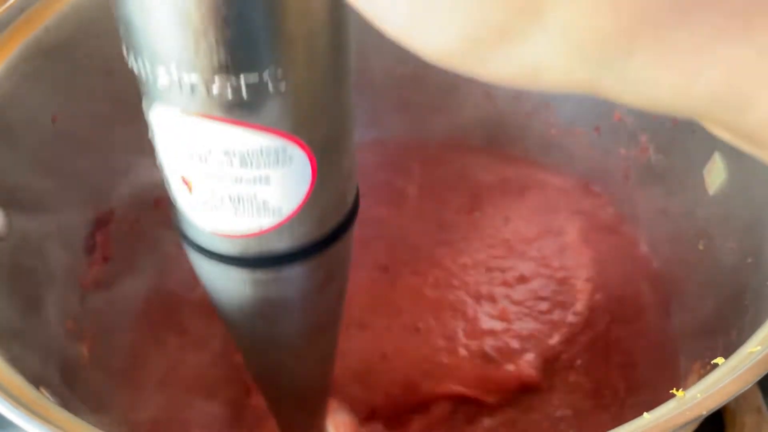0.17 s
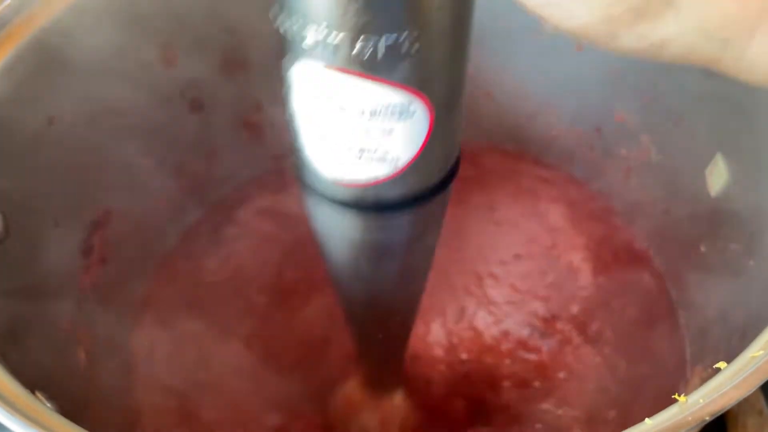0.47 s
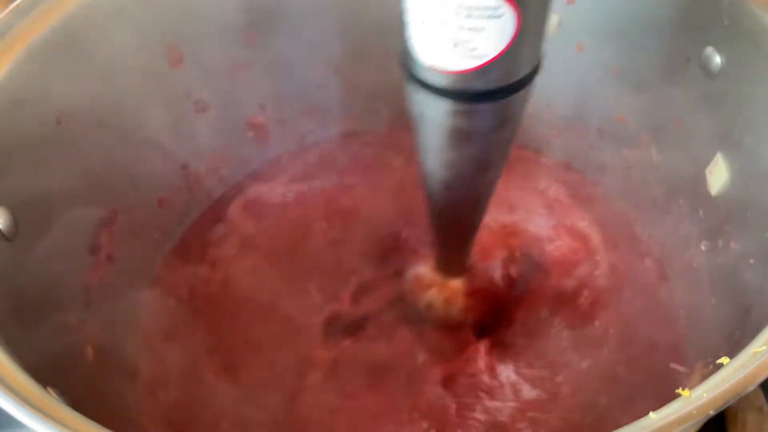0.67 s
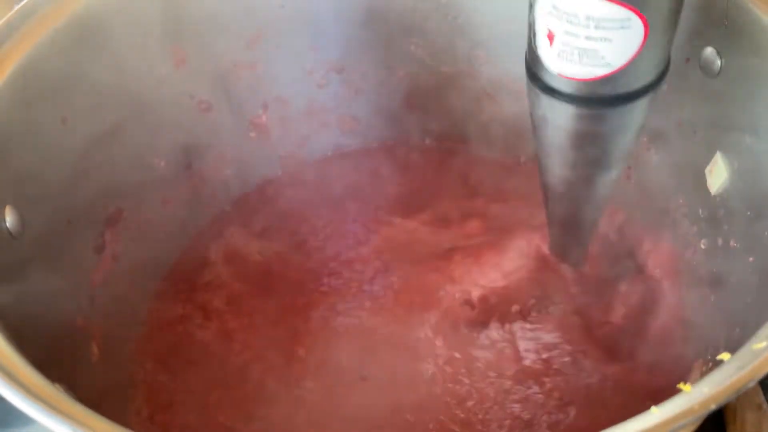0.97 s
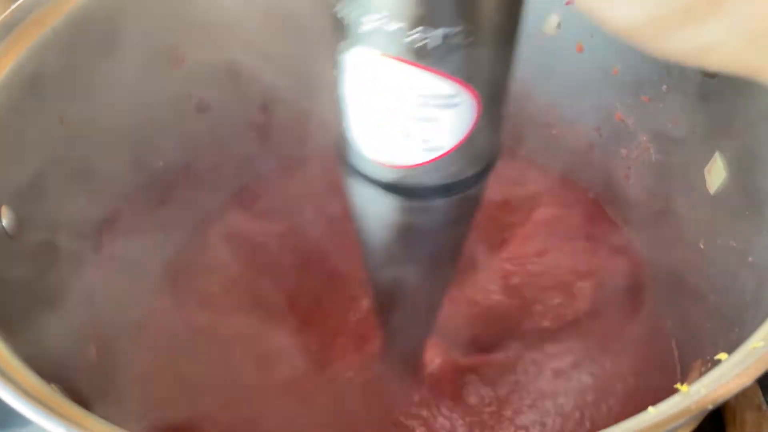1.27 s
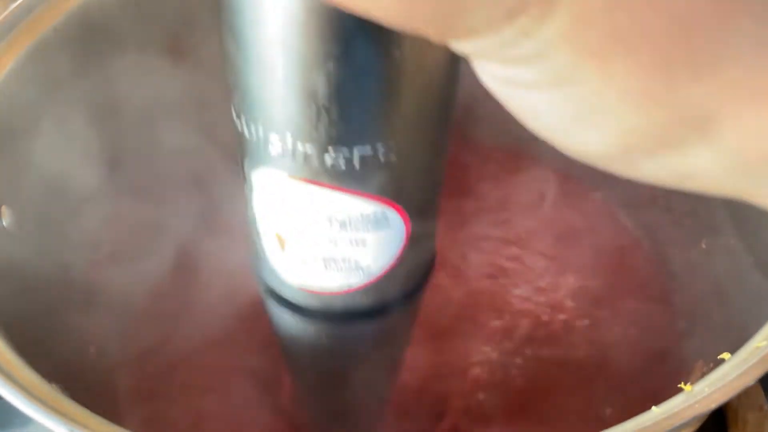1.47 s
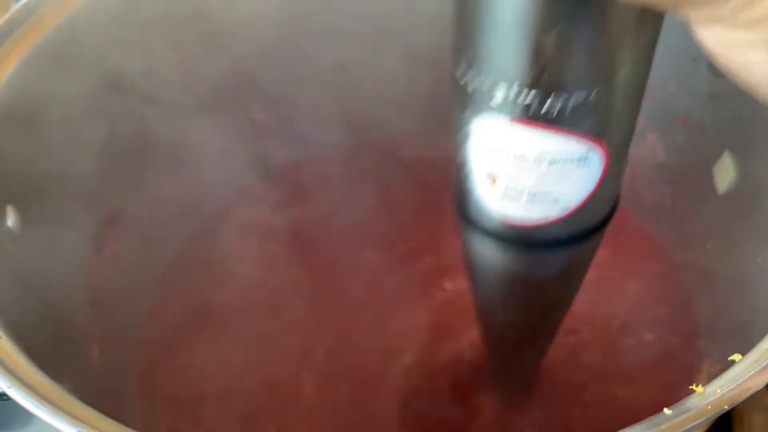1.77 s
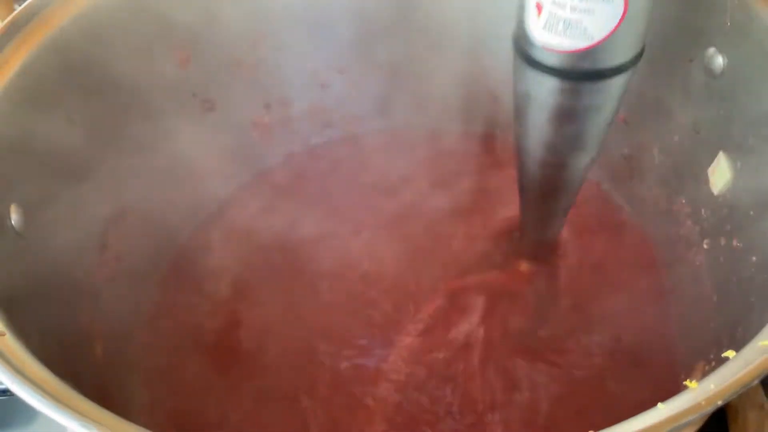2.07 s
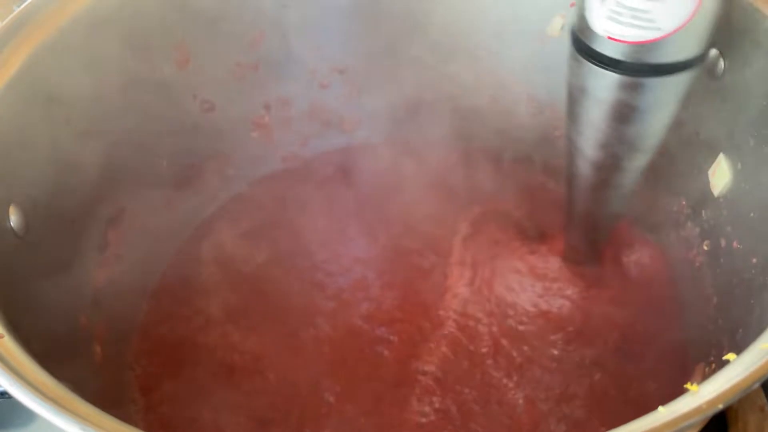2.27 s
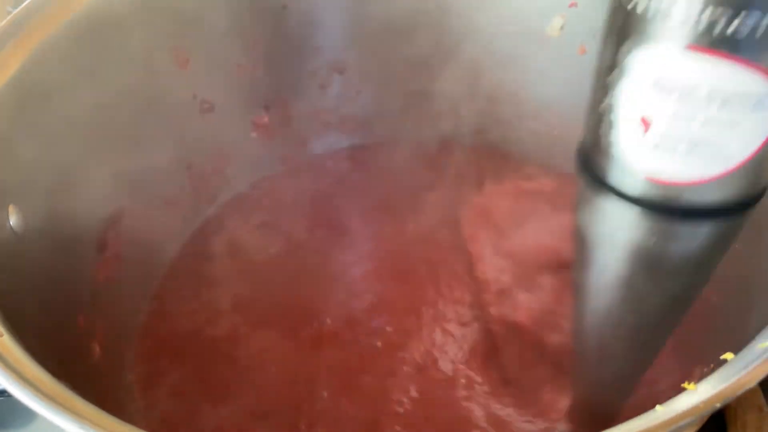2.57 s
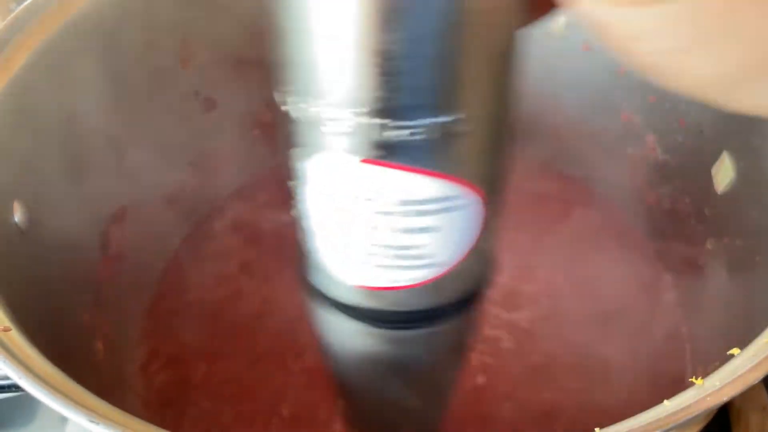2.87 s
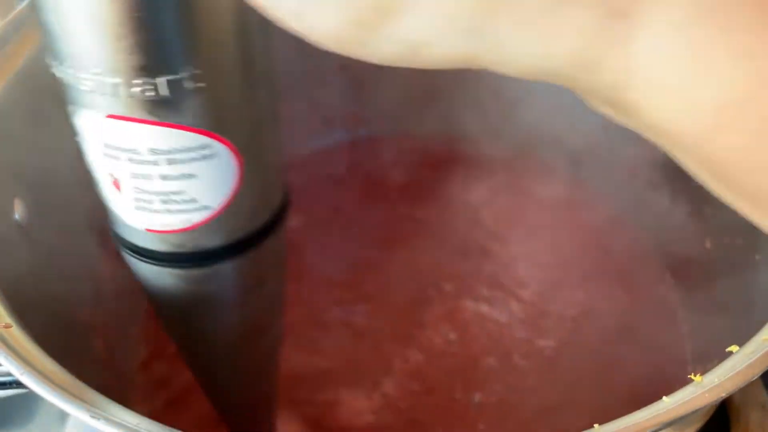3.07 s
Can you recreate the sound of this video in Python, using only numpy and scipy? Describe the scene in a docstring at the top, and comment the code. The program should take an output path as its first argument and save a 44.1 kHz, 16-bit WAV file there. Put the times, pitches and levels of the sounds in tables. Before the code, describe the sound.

A hand blender hums and slurps through thick sauce in a pot, briefly cutting out twice.

```python
"""A hand blender purees fruit sauce in a steel pot, close by in a kitchen.
Its two-winged blade hums at twice the shaft speed where it bites into the sauce, and the churning
makes the pot ring. Near the surface it draws in air, so the sauce slurps, gurgles and spatters.
The motor's brushes hiss and whine above. Twice the switch is let go and pressed again."""
import sys
import numpy as np
from scipy import signal
from scipy.fft import rfft, irfft, next_fast_len
from scipy.io import wavfile
from scipy.ndimage import uniform_filter1d, minimum_filter1d, map_coordinates

SR = 44100
rng = np.random.default_rng(int(sys.argv[2]) if len(sys.argv) > 2 else 0)


def transcribe(signal):
    """Save signal, clipped to [-1, 1], as a 16-bit WAV file at the path in sys.argv[1]."""
    frames = np.atleast_2d(signal).T
    limited = np.clip(frames, -1, 1)
    pcm = np.round(limited * 32767).astype(np.int16)
    wavfile.write(sys.argv[1], SR, pcm)


N = 141120

# the blade gulps air: start/s, length/s, level/dB, change over the gulp/dB, extra treble/dB
GULPS = [(-0.004, 0.13, -35, -2, 9.5), (0.135, 0.18, -39.5, -0.5, 8.5), (0.338, 0.054, -30, -1.5, -3),
         (0.392, 0.078, -24.5, 1, 4), (0.471, 0.18, -26, -4.5, 0.5), (0.654, 0.086, -32, 5, 5),
         (0.752, 0.15, -30.5, -8.5, -1), (1.356, 0.21, -36, -3, -3.5), (1.609, 0.047, -25, -13, -12),
         (1.67, 0.067, -19.5, -5, -1.5), (1.746, 0.034, -40, 16, -2), (2.357, 0.034, -24.5, -6, 2),
         (2.398, .115, -40.5, 2.5, 3), (2.53, 0.27, -42, -3.5, 5.5), (3.094, 0.053, -33, -5, -2.5)]


def amp(db):
    """Turn decibels into a gain."""
    return 10 ** (np.asarray(db) / 20)


def unit(x):
    """Scale x to an average size (rms) of 1."""
    return x / np.sqrt(np.mean(x ** 2) + 1e-20)


def clock():
    """The time of every sample, in seconds."""
    return np.arange(N) / SR


def curve(rows):
    """Join (t/s, value) points with straight lines."""
    return np.interp(clock(), *np.transpose(rows))


def along(points, hz):
    """Read between (f/Hz, value) points on a log frequency scale."""
    f, v = np.transpose(points)
    return np.interp(np.log(hz + 1), np.log(f + 1), v)


def wobble(rate):
    """A smooth curve through `rate` random values a second."""
    return map_coordinates(rng.standard_normal(4096), [clock() * rate + 2], mode="mirror")


def filtered(x, response):
    """Multiply each frequency in x by response(frequency)."""
    size = next_fast_len(N + SR // 2)
    return irfft(rfft(x, size) * response(np.fft.rfftfreq(size, 1 / SR)), size)[..., :N]


def coloured(x, spectrum):
    """Shape the tone of x with (f/Hz, level/dB) points, then scale to rms 1."""
    return unit(filtered(x, lambda hz: amp(along(spectrum, hz))))


def resonances(rows):
    """The response of something that rings at each (f/Hz, width/Hz, level/dB)."""
    return lambda f: sum(amp(db) * 1j * f * width / (hz * hz - f * f + 1j * f * width)
                         for hz, width, db in rows)


def burst(start, length, attack_s=0.019, release_s=0.0048):
    """A gain that rises quickly, holds, then dies away."""
    t = clock() - start
    return np.clip(t / attack_s + .5, 0, 1) * np.exp(-np.maximum(t - length, 0) / release_s)


def shaft_tones(turns, multiples, rough, rough_hz):
    """Tones at multiples of the shaft speed, each shaken in size and phase."""
    out = np.zeros(N)
    for multiple, db in multiples:
        shake = 1 + rough * (wobble(rough_hz) + 1j * wobble(rough_hz))
        out += amp(db) * np.sqrt(2) * np.real(shake * np.exp(2j * np.pi * multiple * turns))
    return out


def bubbles(per_s, size_db, cycles, lo_hz, hi_hz, count=15000, size=192):
    """A crackle of bursting bubbles, each a tiny fading tone."""
    dice = rng.random((count, 4))
    start = np.cumsum(-np.log(1 - dice[:, 0])) / per_s
    hz = lo_hz * (hi_hz / lo_hz) ** dice[:, 1:2]
    strength = amp(-size_db * np.log(1 - .98 * dice[:, 2:3]))
    n = np.arange(size)
    rings = strength * hz * np.exp(-n / SR * hz / cycles) * np.sin(2 * np.pi * hz * n / SR)
    places = (start * SR).astype(int)[:, None] + n
    return unit(np.bincount(places.ravel(), rings.ravel(), N)[:N])


def snap(start, hz, octaves, t60):
    """A snap of noise around one frequency; it fades 60 dB in t60 seconds."""
    size = 4096
    t, f = np.arange(size) / SR, np.fft.rfftfreq(size, 1 / SR)
    band = np.exp(-.5 * (np.log2((f + 1) / hz) / octaves) ** 2)
    noise = unit(irfft(rfft(rng.standard_normal(size)) * band))
    shot = noise * amp(-60 * t / t60) * (1 - np.exp(-t / 0.00014))
    return np.pad(shot / np.abs(shot).max(), (round(start * SR), N))[:N]


def kitchen():
    """The quiet, low rumble of the kitchen."""
    # tone of the rumble: f/Hz, level/dB
    spectrum = [(20, -16), (60, 8), (120, 25.5), (350, -4), (900, -78), (3000, -8), (15000, -20)]
    return amp(-51) * coloured(rng.standard_normal(N), spectrum)


def room(x):
    """The pot wall and the kitchen send back a blurred echo, different in each ear."""
    # how long the echo lasts: f/Hz, time to fade 60 dB/s
    fade_times = [(150, 0.1), (1000, 0.03), (5000, 0.27), (15000, 0.2)]
    # how loud it is: f/Hz, level/dB
    echo_levels = [(150, -9.5), (350, -13.5), (700, -5), (2500, -6.5), (12000, -8)]
    hz, t, noise = signal.stft(rng.standard_normal((2, SR // 3)), SR, nperseg=256)
    t60 = along(fade_times, hz)[:, None]
    energy = t60 * SR / np.log(10 ** 6)
    tail = signal.istft(noise * amp(-60 * t / t60) / np.sqrt(energy), SR, nperseg=256)[1]
    echo = signal.fftconvolve(x[None], tail, axes=1)[:, :N]
    return filtered(echo, lambda f: amp(along(echo_levels, f)))


def switch():
    """The button clicks as it is pressed or let go."""
    # clicks: t/s, level/dB
    clicks = [(1.096, -31), (2.865, -30.5), (2.867, -29), (3.012, -29), (3.017, -34)]
    return sum(amp(db) * snap(start, hz=4700, octaves=2.0, t60=0.011) for start, db in clicks)


def singing():
    """The blade's steel rings thinly when it spins free."""
    # spells of ringing: start/s, length/s, level/dB
    spells = [(0.865, .17, -54), (2.466, 0.267, -56)]
    steel = resonances([(7400, 280, 0)])
    ring = unit(filtered(rng.standard_normal(N), steel))
    return sum(amp(db) * burst(start, length) for start, length, db in spells) * ring


def motor(turns):
    """Brushes hiss and whine on twelve spinning contacts, fading as the motor coasts."""
    # the switch is let go: from/s, to/s
    pauses = [(.865, 1.101), (2.861, 3.012)]
    # tone of the hiss: f/Hz, level/dB
    brushes = [(50, -32), (500, 11.5), (1200, 13), (2000, 5), (3800, 3), (6100, 5), (7600, -19),
               (9300, 4.5), (11300, -13), (13000, 0), (15800, -3.5)]
    # tones of the whine: multiple of shaft speed, level/dB
    whine_tones = [(12, -61.5), (36, -63), (60, -62.5), (72, -62.5), (78, -66)]
    # loudness of the whine: t/s, level/dB
    whine_level = [(0, 6), (1.1, -4), (1.3, 3.5), (1.85, 2), (2.3, -0.5), (2.5, -6), (3.2, -26)]
    coast_db_per_s, spin_up_s = 121, 0.0037
    t, drop_db = clock(), np.zeros(N)
    for off, on in pauses:
        coast_db = coast_db_per_s * np.clip(t - off, 0, on - off)
        drop_db += coast_db * np.exp(-np.maximum(t - on, 0) / spin_up_s)
    sparks = rng.standard_normal(N) * (1 + 0.15 * np.cos(2 * np.pi * turns))
    hiss = amp(-46.5) * coloured(sparks, brushes)
    whine = shaft_tones(turns + .0062 * wobble(500), whine_tones, rough=1.2, rough_hz=500)
    return amp(-drop_db) * (hiss + amp(curve(whine_level)) * whine)


def sizzle():
    """Very fine droplets leave the surface with a bright, wet ticking."""
    # spells of sizzling: start/s, length/s, level/dB
    spells = [(0.07, 0.054, -42), (0.336, 0.27, -42), (0.664, 0.082, -37), (1.659, 0.078, -39),
              (2.359, 0.37, -54)]
    # tone of the droplets: f/Hz, level/dB
    spectrum = [(5000, -44), (9000, 0), (12300, 2), (15800, -7)]
    drops = coloured(bubbles(per_s=1000, size_db=6, cycles=5, lo_hz=8400, hi_hz=14700), spectrum)
    return sum(amp(db) * burst(start, length) for start, length, db in spells) * drops


def burble():
    """Larger bubbles plop at random, muffled by the thick sauce."""
    # loudness of the plops: t/s, level/dB
    level = [(.3, -43), (.43, -36), (.85, -36), (1.05, -59), (1.2, -40), (2, -40.5), (2.25, -32),
             (2.48, -33), (2.6, -57)]
    muffle = [(150, -21), (400, -5), (780, -0.5), (1000, -9), (2000, -43)]  # f/Hz, level/dB
    plops = bubbles(per_s=230, size_db=3.5, cycles=5.7, lo_hz=403.3, hi_hz=830, count=1200, size=2048)
    return amp(curve(level)) * coloured(plops, muffle)


def gurgles():
    """Each air pocket rings with a brief, ragged tone that sinks as the pocket widens."""
    # air pockets: start/s, length/s, f/Hz, level/dB
    pockets = [(0.016, 0.07, 753, -35.5), (0.041, 0.024, 575, -28.5), (.395, 0.059, 857, -27),
               (0.427, 0.05, 795, -25), (0.442, 0.028, 2650, -31), (0.496, 0.025, 2600, -31),
               (0.519, 0.043, 2027, -27.5), (1.674, 0.078, 2395, -26), (1.705, 0.056, 819.4, -22),
               (2.369, 0.032, 2014, -31), (2.354, 0.052, 768, -21.5), (2.386, 0.025, 3148, -36),
               (2.414, 0.021, 1660, -33.5), (2.485, 0.055, 1630, -44), (2.473, 0.036, 788, -31),
               (3.033, 0.036, 130, -36)]
    fall_octaves_per_s = 1.86
    out, waver, flutter = np.zeros(N), 1 + .06 * wobble(800), 1 + .55 * wobble(300)
    for start, length, hz, db in pockets:
        span = np.flatnonzero((clock() >= start) & (clock() < start + length))
        t = span / SR - start
        pitch = hz * 2 ** (-fall_octaves_per_s * t) * waver[span]
        swell = amp(db) * np.sqrt(2) * np.sin(np.pi * t / length)
        out[span] += swell * np.sin(2 * np.pi * (np.cumsum(pitch) / SR + rng.random()))
    return out * flutter


def spatters():
    """Blobs of sauce are flung from the blade."""
    # blobs: t/s, level/dB, f/Hz
    blobs = [(.4, -9, 2490), (.409, -14.5, 9500), (0.421, -15.5, 8900), (.449, -13.5, 3500),
             (0.647, -18.5, 11400), (0.685, -18.5, 7600), (.703, -12.5, 5150), (.747, -21, 10000),
             (.786, -19, 11040), (0.797, -24, 10980), (0.815, -20, 10500), (0.849, -17.5, 3130),
             (.863, -18.5, 10800), (0.867, -20.5, 3900), (1.439, -17.5, 10900), (1.44, -24, 4500),
             (1.635, -10, 1946), (1.695, -17, 5000), (1.734, -16, 2798), (1.777, -14, 2595),
             (1.819, -20, 4303), (1.974, -33, 11200), (2.379, -23.5, 9702), (2.382, -26, 2350),
             (2.446, -28, 3804), (2.55, -33, 7000), (3.083, -24.5, 4282), (3.135, -14.5, 2684),
             (3.137, -23.5, 10050)]
    return sum(amp(db) * snap(start, hz, octaves=0.43, t60=0.014) for start, db, hz in blobs)


def slurp(turns):
    """Air chopped into the sauce makes spurts of bubbles and spray that pulse with each turn."""
    # tone of the bubbles: f/Hz, level/dB
    bubble_tone = [(60, -65), (200, -19), (500, -28), (820, 6), (1050, 2), (1400, 2), (2400, -1.5),
                   (3600, -3.5), (5500, -11), (10000, -54)]
    # tone of the spray: f/Hz, level/dB
    spray_tone = [(700, -60), (4000, -3.5), (6500, 4), (8000, -1.5), (10000, 7), (12000, -25), (15500, 0)]
    bubble_gain, spray_gain = np.zeros(N), np.zeros(N)
    for start, length, db, change_db, treble_db in GULPS:
        progress = np.clip((clock() - start) / length, 0, 1)
        gulp = amp(db + change_db * progress) * burst(start, length)
        bubble_gain += gulp
        spray_gain += amp(treble_db) * gulp
    chop = unit(amp(2.5 * wobble(130)) * (1 + 0.2 * np.cos(2 * np.pi * turns)))
    coarse = bubbles(per_s=3500, size_db=5, cycles=3.6, lo_hz=584, hi_hz=7170)
    coarse += .5 * rng.standard_normal(N)
    fine = bubbles(per_s=3500, size_db=0, cycles=2.4, lo_hz=3350, hi_hz=14000)
    fine += .5 * rng.standard_normal(N)
    spray_gain *= amp(-11 + 3.5 * wobble(110))  # the treble flickers
    return chop * (bubble_gain * coloured(coarse, bubble_tone) + spray_gain * coloured(fine, spray_tone))


def churn():
    """The sauce swirls in lumps and makes the pot ring."""
    # tone of the swirling: f/Hz, level/dB
    spectrum = [(20, -31), (60, -22), (130, -6.5), (250, 3.5), (420, -3.5), (560, -10.5), (900, -10),
                (1400, -16), (3000, -21.5), (8000, -46)]
    # where the pot rings: f/Hz, width/Hz, level/dB
    pot = [(186.4, 23.7, 2.5), (346, 93, 8), (766, 14, 10)]
    # loudness of the churning: t/s, level/dB
    level = [(0, -33.5), (.24, -33.5), (.38, -21), (.6, -24.5), (.88, -24.5), (.98, -37.5), (1.08, -56),
             (1.17, -29), (1.4, -28), (1.58, -26), (1.71, -16.5), (1.85, -25), (2.15, -24), (2.42, -26.5),
             (2.54, -34), (2.78, -35.5), (2.98, -54.5), (3.05, -36.5), (3.14, -27.5), (3.2, -46)]
    ring = unit(filtered(coloured(rng.standard_normal(N), spectrum), resonances(pot)))
    flow = coloured(rng.standard_normal(N), spectrum)
    lumps_db = 1.6 * wobble(40)
    return amp(curve(level) + lumps_db) * (amp(-1.5) * ring + amp(-7) * flow)


def blade(turns):
    """The two wings hum, more roughly when they draw air; the strained shaft drones and throbs."""
    # tones of the blade: multiple of shaft speed, level/dB
    hum_tones = [(1, -33.5), (2, -1), (3, -28.5), (4, -33)]
    # how hard the blade bites: t/s, level/dB
    bite = [(0, -26.5), (.16, -48), (.305, -32), (.322, -19), (.355, -19.5), (.385, -14), (.5, -16),
            (.72, -18.5), (.89, -23.5), (.93, -27), (.97, -68), (1.09, -56), (1.16, -22), (1.205, -15),
            (1.31, -25), (1.41, -28.5), (1.47, -18.5), (1.58, -18.5), (1.65, -13.5), (1.73, -14),
            (1.81, -24), (1.88, -30), (1.94, -16), (2.03, -21), (2.085, -29), (2.13, -15.5), (2.265, -13),
            (2.283, -24), (2.328, -16.5), (2.343, -6.5), (2.395, -6.5), (2.435, -19), (2.508, -16),
            (2.53, -78), (2.85, -43), (2.97, -83), (3.12, -32.5), (3.2, -48)]
    # tones of the shaft: multiple of shaft speed, level/dB
    drone_tones = [(3, -53), (4, -39), (5, -37), (8, -49.5)]
    # strain on the shaft: t/s, level/dB
    strain = [(.3, -31), (.45, -7), (.88, 5), (1, -46), (1.1, -21), (1.18, 0), (1.75, 1.5), (1.88, -16),
              (2.1, -19), (2.3, 2), (2.49, -21), (2.54, -26), (3.2, -54)]
    # throb of the off-balance shaft: t/s, level/dB
    imbalance = [(.25, -50), (.42, -33.5), (.88, -34), (.98, -79), (1.2, -42), (2.5, -56)]
    air = sum(amp(db) * burst(start, length) for start, length, db, _, _ in GULPS)
    rough = .15 + .17 * np.sqrt(air / air.max())
    hum = amp(curve(bite) + wobble(70)) * shaft_tones(turns, hum_tones, rough, rough_hz=100.8)
    drone = amp(curve(strain)) * shaft_tones(turns, drone_tones, rough=.65, rough_hz=70)
    once_a_turn = [(1, 0)]
    one_sided_gulp = amp(-15) * burst(start=1.655, length=0.07)
    thud = one_sided_gulp * shaft_tones(turns, once_a_turn, rough=.15, rough_hz=90)
    throb = amp(curve(imbalance)) * shaft_tones(turns, once_a_turn, rough=.2, rough_hz=30)
    return hum + drone + throb + thud


def scene():
    """The blender works a little to the right, over the kitchen's rumble."""
    # shaft speed: t/s, turns a second/Hz
    speed = [(0, 190), (.1, 183), (.32, 176), (.44, 168), (.54, 175), (.72, 166.3), (.87, 166), (.95, 146),
             (1.095, 135), (1.145, 151.4), (1.24, 162.7), (1.39, 168), (1.5, 166), (1.69, 165), (1.86, 159),
             (1.95, 173), (2.17, 179.4), (2.3, 167.6), (2.5, 174), (2.865, 162), (3.012, 107), (3.06, 176),
             (3.2, 172)]
    # higher ringing of the pot wall: f/Hz, width/Hz, level/dB
    wall = [(820, 142, 6.5), (1980, 46, -14), (2680, 72, 0)]
    # left ear compared with right: f/Hz, level/dB
    balance = [(170, -2.5), (380, -3.5), (700, -1.9), (1200, -3), (2500, -3.5), (5000, -5.5), (8500, 0.1)]
    left_lag_s, sides = .00001, np.array([[1], [-1]])
    turns = np.cumsum(curve(speed) * (1 + 0.00421 * wobble(25.06))) / SR
    wet = amp(-2) * slurp(turns)
    sauce = churn() + burble() + wet + filtered(wet, resonances(wall))
    sauce += gurgles() + sizzle() + spatters()
    near = motor(turns) + blade(turns) + singing() + sauce + switch()
    direct = filtered(near, lambda hz: np.exp(-1j * np.pi * hz * left_lag_s * sides))
    # hiss and spray come from all over the pot, so each ear hears them differently
    spread = amp(-6.5) * (motor(turns) + slurp(turns) + spatters() + switch()) * sides
    mix = kitchen() + direct + spread + room(near)
    return filtered(mix, lambda hz: amp(along(balance, hz) * sides / 2))


def record(dry):
    """A limiter turns down the loudest peaks, then the highest treble is cut off."""
    ceiling, top_hz = .98, 16100
    safe_gain = np.minimum(1, ceiling / (np.abs(dry).max(axis=0) + 1e-9))
    gain = uniform_filter1d(minimum_filter1d(safe_gain, size=600), size=300)
    return filtered(dry * gain, lambda hz: hz < top_hz)


dry = scene()
out = record(dry)
transcribe(out)
```